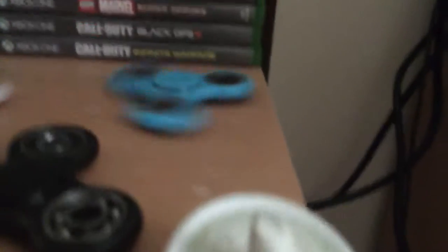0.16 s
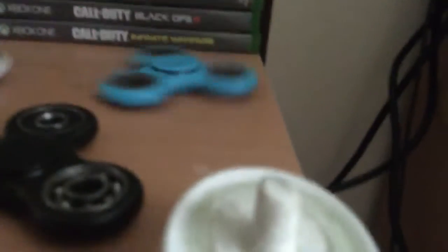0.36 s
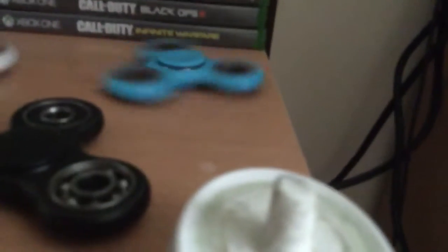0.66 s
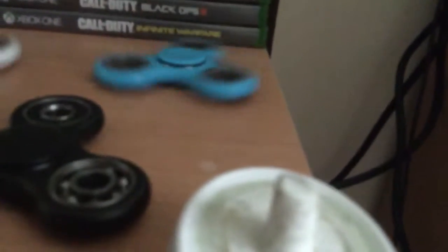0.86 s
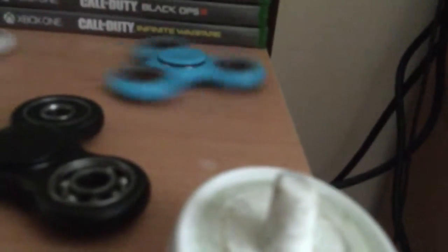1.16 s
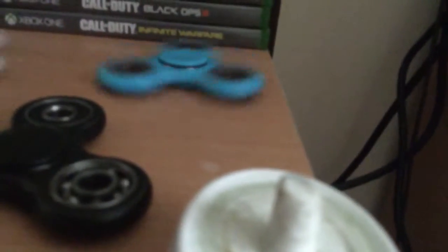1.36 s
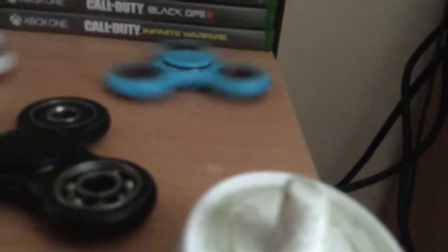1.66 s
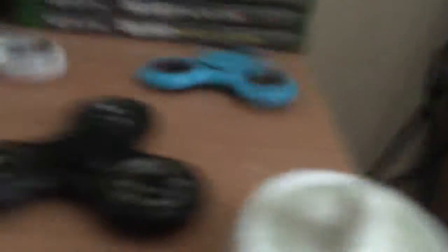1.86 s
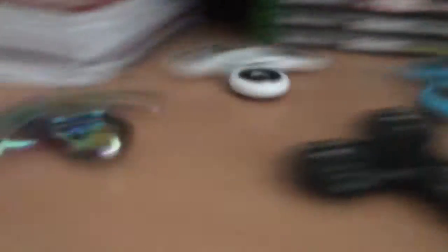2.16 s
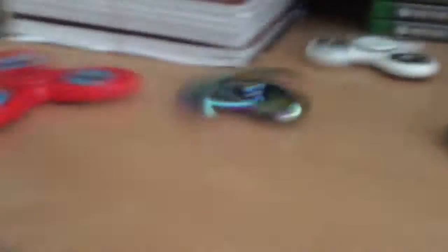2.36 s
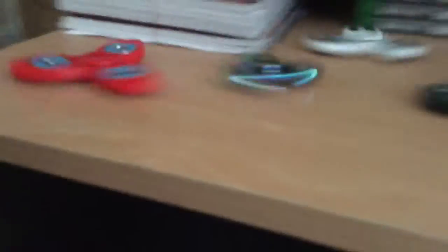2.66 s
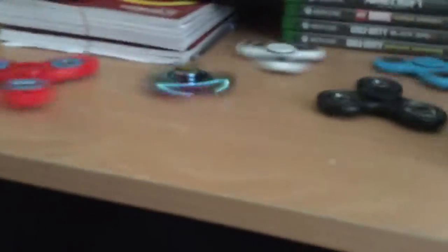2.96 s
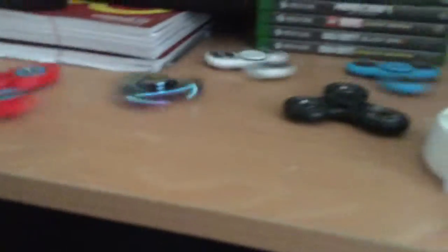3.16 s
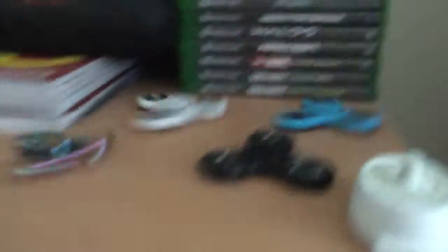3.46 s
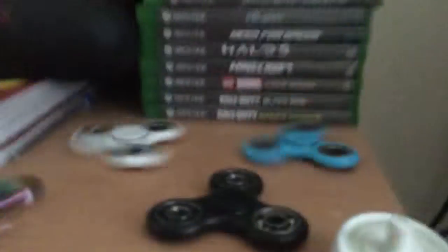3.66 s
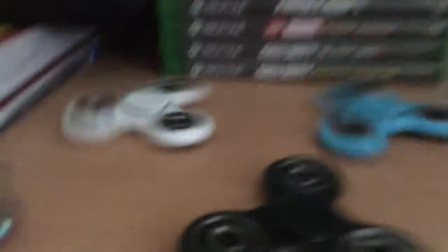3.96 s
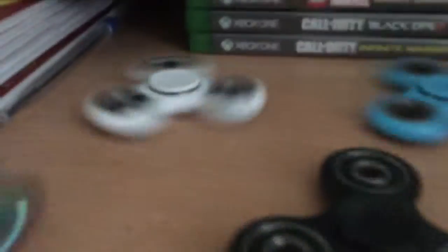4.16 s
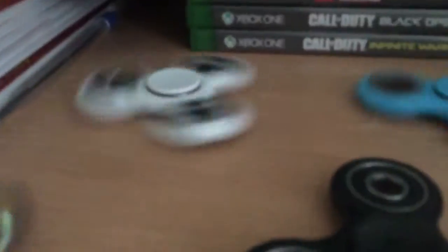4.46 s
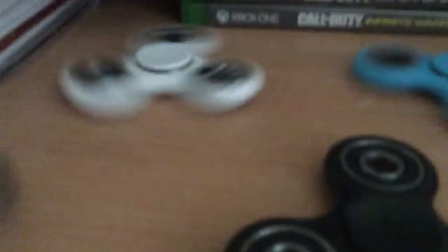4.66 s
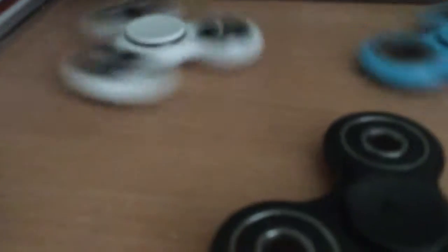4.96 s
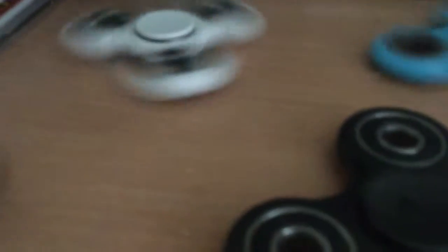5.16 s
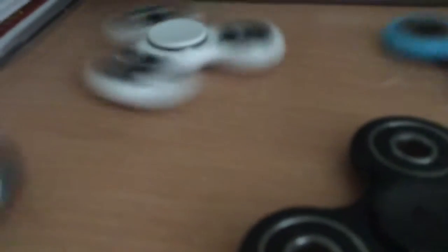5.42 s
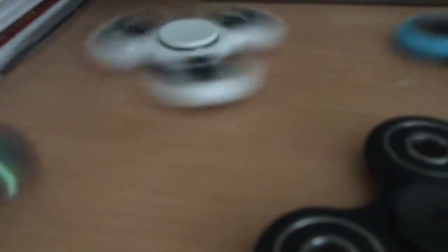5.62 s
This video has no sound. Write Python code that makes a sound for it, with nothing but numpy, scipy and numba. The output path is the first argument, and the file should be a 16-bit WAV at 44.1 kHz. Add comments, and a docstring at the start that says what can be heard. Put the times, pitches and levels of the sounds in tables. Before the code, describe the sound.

A dry metallic and plastic whirring rattle runs throughout, pulsing several times a second, with irregular ball clatters and dull low knocks. It starts close and full, grows fainter and mixed as the camera pans past other spinners in the middle, then comes near again after four seconds. Low handling rumbles and thumps, faint airy hiss and quiet indoor room tone; the handheld microphone stays close.

```python
"""A loose rattle over a humming desk comes first: four fidget spinners, with a camera panning close past.
Loose bearing balls rattle, harder once a turn, and ring each plastic or metal body and the desk top.
Catching bearings jolt the desk, and balls clatter. Fingers shift on the camera with rumbles, thumps and taps.
An airy hiss swells now and then, a quiet room hisses behind, and later come a rising whirr and thin whines."""
import sys
import numpy as np
from scipy import signal
from scipy.fft import rfft, irfft
from scipy.io import wavfile
from scipy.ndimage import uniform_filter1d, map_coordinates
from numba import njit

SR = 44100
rng = np.random.default_rng(int(sys.argv[2]) if len(sys.argv) > 2 else 0)


def undo_db(level):
    """Turn decibels back into plain size, where 20 dB means ten times bigger."""
    steps = np.asarray(level, float) / 20
    return 10 ** steps


def generate_wav(sig):
    """Save sig (samples, or channels by samples) to the path in sys.argv[1] as 16-bit PCM at SR."""
    pcm = np.round(np.clip(np.atleast_2d(sig).T, -1, 1) * 32767).astype(np.int16)
    wavfile.write(sys.argv[1], SR, pcm)


N = 255311  # length [samples]
T = np.arange(N) / SR  # time of each sample [s]
HZ = np.fft.rfftfreq(N, 1 / SR) + 1e-9  # just above zero, so that its logarithm exists

# Loudness of each spinner as the camera moves, before the dips:
# (time [s], first [dB], second [dB], third [dB], fourth [dB])
NEARNESS = [(0, -52, -58.5, -61.5, -63), (.6, -52, -62.5, -58, -64.5), (1.2, -51.5, -63, -81, -62.5),
            (1.85, -51.5, -64.5, -59, -61.5), (2.05, -61, -60.5, -56, -59), (2.3, -64, -58.5, -63, -62),
            (2.55, -73, -60, -78, -62), (3.1, -64.5, -62.5, -68, -75), (3.4, -63.5, -63, -62.5, -66),
            (3.6, -66, -69, -60, -58), (3.86, -81, -63.5, -53, -58.5), (4.05, -96, -61, -64.5, -55),
            (4.6, -62, -62, -85, -56), (5.2, -69, -63.5, -78, -54.5), (5.79, -61.5, -62, -77, -56)]
# Spin of each spinner: (start speed [turns/s], end speed [turns/s], basic swell once a turn [dB],
# rolling hiss over the rings [dB], a moment of loudest rattle [s])
SPIN = [(8.5, 8.2, 0.5, -23, .89), (8.6, 16, 1.9, -13.5, 2.65), (23, 23, 2, -25, 3.81),
        (10, 8.5, 1.5, -7.5, 5.19)]
# Body resonances of each spinner, before the pitch slides: (pitch [Hz], width [Hz], level [dB])
BODIES = [
    [(626, 25, -8.5), (830, 41, -4), (1107, 77, -1.5), (1490, 34, 5), (1593, 66, 5.5), (2277, 220, -2),
     (2966, 93, -2.5), (3397, 104, -2), (4110, 114, -0.5), (4920, 99, -7), (5420, 59, -10.5),
     (7000, 990, -32.5), (8650, 220, -32.5)],
    [(647, 15, -1.5), (1020, 23, -3.5), (1393, 137, -1.5), (1920, 59, -2), (2600, 73, 1.5),
     (3362, 130, -3.5), (4390, 120, -11), (5290, 195, -9.5), (6940, 200, -21.5)],
    [(580, 98, -18.5), (1409, 75, 4), (2013, 106, 2), (2703, 100, -3.5), (3610, 110, -8.5),
     (4940, 120, -12.5), (6960, 180, -24)],
    [(807, 24, 1), (1271, 87, 6), (1657, 226, 0.5), (2638, 240, 1.5), (3010, 232, -0.5), (4027, 170, -5),
     (4910, 92, -5.5), (5410, 120, -10), (5570, 71, -3.5), (6940, 170, -19.5)],
]
# Rings that flutter together: (from [Hz], to [Hz], share of the common swell [0-1], own flutter [dB])
RING_GROUPS = [(0, 2300, 0.41, 0.13), (2300, 3750, 0.59, 3), (3750, 9500, 0.79, 2)]
# The rings slide in pitch as the camera swings:
# (time [s], first [share of pitch], second [share], third [share], fourth [share])
RING_SLIDE = [(0, 0.98, 1.08, 1., 1.), (1.9, 1., 1.05, 1.06, 1.04), (2.1, 0.92, 0.98, 1.01, 1.01),
              (2.35, 0.94, 1.014, .96, .97), (2.8, 0.95, 0.99, .95, .97), (3.3, 0.95, 1.033, .96, .97),
              (3.7, 0.97, 1.03, .995, .985), (4.15, 0.95, 0.98, 1.03, 1.), (5.79, 1., 1.04, 1.03, 1.)]
# Colour of the rolling hiss between the resonances: (frequency [Hz], relative level [dB per Hz])
ROLL_COLOUR = [(300, -56), (600, 7), (1000, -8.5), (2000, 0.5), (3500, -7), (5600, 1), (6200, -11.5),
               (8000, -23), (11000, -27.5), (15200, -57)]
# The desk's echo cancels three bands that slide with the camera's height:
# (time [s], upper band [Hz], lower band [Hz], depth of these two [0-1], top band before its wander [Hz])
ECHO_DIP = [(0, 2040, 1154, 0.65, 3770), (1.95, 2050, 1150, 0.58, 3780), (2.4, 1420, 850, 0.56, 3540),
            (2.7, 1490, 806, 0.75, 3700), (3.1, 1500, 740, 0.67, 3900), (3.4, 1638, 860, 0.61, 3820),
            (3.7, 1760, 1020, 0.84, 3940), (4.4, 1920, 1105, 0.53, 3788), (5.79, 1930, 1130, 0.52, 3660)]
# A fourth narrow dip: (time [s], centre [Hz], depth [0-1])
MID_DIP = [(0, 2500, 0.2), (2.0, 2340, 0.26), (2.25, 2230, .7), (2.5, 2210, .9), (2.75, 2150, 0.2),
           (3.2, 2200, 0.6), (3.6, 2400, .3), (4.05, 2330, .75), (4.4, 2250, 0.2), (5.79, 2150, .4)]
# Colour of the airy hiss: (frequency [Hz], relative level [dB per Hz])
WHISK_COLOUR = [(5000, -26), (7500, 0), (9000, 3.5), (12000, -13), (15200, -12)]
# The airy hiss swells briefly: (middle [s], length [s], peak added to the steady part [dB])
WHISK_SWELLS = [(0.073, 0.087, -78), (.53, 0.11, -80), (0.748, 0.092, -88), (.97, .14, -82),
                (1.2, 0.089, -92), (1.398, .12, -85), (1.625, .12, -85), (1.823, .12, -84),
                (3.75, 0.11, -84), (4.08, .08, -88), (4.245, 0.14, -81), (5.03, .08, -81), (5.187, .1, -83),
                (5.54, 0.069, -79), (5.646, 0.12, -79)]
# Hum of the desk top, louder with the camera near: (time [s], level [dB], deeper mode over it [dB])
DESK_LEVEL = [(0, -50, -13), (.4, -54.5, -7), (.8, -52.5, -6), (1.5, -51, -8), (1.95, -50.5, -6),
              (2.07, -53, -13), (2.3, -57, -6), (2.6, -62, -3.5), (2.9, -62.5, -25), (3.2, -62.5, -8),
              (3.6, -61, -14), (4.15, -51, -9), (4.7, -51, -5.5), (5.1, -49.5, -9), (5.45, -51.5, -5),
              (5.79, -51, 0.5)]
# Pitch of the desk hum heard from the camera, before its wander: (time [s], pitch [Hz])
DESK_PITCH = [(0, 356), (2., 358), (3., 346), (4.2, 366), (4.6, 350.), (5.1, 337), (5.79, 347)]
# Desk top resonances: (share of that pitch [ratio], width before widening [Hz], relative level [dB])
DESK_MODES = [(0.998, 53.9, 2), (1.223, 121, -20)]
# Fingers slide on the case: (middle [s], length [s], peak rumble added to the hold [dB])
DRAGS = [(0.034, 0.088, -54.5), (0.26, 0.35, -49), (0.787, 0.083, -64), (0.912, 0.072, -56.5),
         (1.186, 0.18, -58), (1.426, 0.35, -57), (1.574, 0.15, -55), (1.72, 0.13, -52.5),
         (1.913, 0.37, -51), (2.12, 0.081, -57), (2.52, 0.2, -74), (2.736, 0.22, -62.5), (3.151, 0.13, -63),
         (3.487, 0.52, -56.5), (3.695, 0.5, -64), (3.994, 0.53, -59.5), (4.23, 0.28, -53),
         (4.432, 0.2, -61), (4.58, 0.14, -56), (4.7, 0.22, -51), (5.233, 0.27, -64.5), (5.583, 0.039, -54),
         (5.703, 0.15, -60.5)]
# Colour of skin rubbing on the case: (frequency [Hz], relative level [dB per Hz])
GRIP_COLOUR = [(50, -50), (75, -0.5), (105, 4.5), (135, -0.5), (180, -9.5), (240, -14), (320, -10),
               (500, -72)]
# Deep sway of the arm: (time [s], level [dB])
SWAY_LEVEL = [(0.0, -54), (0.35, -74), (0.47, -84), (0.55, -55), (0.61, -74), (1.85, -63), (1.89, -60),
              (2.43, -70.5), (3.77, -64), (4.11, -74), (4.19, -59), (4.24, -67), (4.74, -67), (4.84, -74),
              (5.76, -67), (5.79, -82)]
# Colour of the sway: (frequency [Hz], relative level [dB per Hz])
SWAY_COLOUR = [(13, -27), (25, -23), (45, -5.5), (65, 0), (80, -5), (110, -44), (200, -71)]
# Colour of the room hiss: (frequency [Hz], relative level [dB per Hz])
ROOM_COLOUR = [(100, -36), (200, 7.5), (500, -14), (1000, -3.5), (4000, -30), (8000, -19.5), (12000, -31),
               (15200, -56)]
# A bearing catches and jolts the desk: (time [s], peak of the swell [dB], ring [Hz])
JOLTS = [(0.021, -38, 331.7), (0.312, -39, 358), (0.458, -42.5, 357.4), (0.498, -43, 350), (0.53, -39, 358),
         (0.561, -41, 348), (0.708, -43, 344), (0.883, -45, 343), (1.017, -42, 356), (1.121, -41.5, 348),
         (1.685, -40.5, 350), (1.826, -37.5, 353), (1.924, -38.5, 320), (2.137, -46.5, 368),
         (2.196, -47, 326), (2.745, -48, 292), (2.764, -54, 302), (3.127, -48, 320), (3.152, -46.5, 322),
         (3.265, -47, 339), (3.434, -51.5, 362), (3.465, -48, 350), (4.233, -40.5, 364),
         (4.245, -37.5, 365), (4.537, -37.5, 360), (4.647, -43.5, 354), (4.698, -36.5, 330),
         (4.722, -46, 300), (4.754, -44, 370), (4.849, -37.5, 325), (4.93, -43, 342), (5.034, -45, 340),
         (5.128, -41.5, 307), (5.181, -39.5, 366), (5.229, -39.5, 340), (5.262, -42, 310),
         (5.308, -43, 312), (5.361, -40.5, 353), (5.496, -37.5, 312), (5.655, -39.5, 346), (5.69, -47, 340),
         (5.748, -51, 352)]
# A loose ball clatters, before the dips: (time [s], middle rings [dB], upper rings over them [dB])
CLATTER = [(0.08, -51, -4), (0.503, -49, -7), (0.531, -47, -9), (.678, -54, -18), (.785, -63, -7),
           (0.8918, -48, -8), (1., -53, -6), (1.019, -52, -6), (1.205, -50, -6), (1.34, -50, -18),
           (1.445, -46, -14), (1.56, -56, -15), (1.582, -49, -18), (2.002, -50, -24), (2.008, -47.5, -15),
           (2.033, -50, -11), (2.059, -48, -20), (2.0936, -51, -15), (2.143, -50, -4), (2.175, -49.5, -13),
           (2.237, -50, -8), (2.6487, -50.5, -8), (3.065, -57.5, -5), (3.702, -50, -13),
           (3.77, -48.5, -8.5), (3.799, -48, -21), (3.8635, -50, -9), (4.273, -49, -16), (4.56, -54, 0),
           (4.655, -49.5, -7.5), (4.8182, -53, -19), (4.956, -54, -17), (5.0274, -48, -12),
           (5.188, -45.5, -7.5), (5.325, -51.5, -25), (5.41, -49, -15), (5.536, -47, -3.5),
           (5.576, -48, -9), (5.692, -49.5, -18), (5.733, -48.5, -9)]
# Lowest ring of the clatter, by the spinner nearest the camera: (time [s], pitch [Hz])
CLATTER_PITCH = [(0, 2980), (1.9, 3050.), (2., 2780.), (2.5, 2610), (3.6, 2720.), (5.79, 2800.)]
# Thumps of the hand: (time [s], peak of the swell [dB], pitch [Hz], length [cycles])
THUMPS = [(0.258, -49, 78, 1.3), (0.319, -52, 102, 2.7), (0.365, -42, 107, 2.5), (1.436, -47, 133, 1.7),
          (1.559, -40, 143, 1.6), (1.923, -43, 111, 2.9), (1.925, -38.5, 190, 1.8), (2.741, -50, 130, 1),
          (2.759, -46, 140, 2.1), (1.973, -48, 200, 2), (3.141, -51, 201, 5.1), (3.259, -44, 165, 5.3),
          (3.402, -43, 110, 3.2), (3.519, -50, 95, 5.2), (3.771, -47, 76, 2.7), (4.157, -38.5, 78.5, 2.9),
          (4.168, -45.5, 139, 3.3), (4.575, -53, 94, 2.5), (4.692, -47, 85, 2.6), (5.385, -50, 75, 2.3),
          (5.355, -48, 225, 5.5)]
# A fingertip taps the case: (time [s], strength [dB])
TAPS = [(1.9788, -27.5), (1.9822, -38), (1.9857, -40), (2.007, -38)]
# Rings of the tapped case: (pitch [Hz], relative level [dB], time to fall by 60 dB [s])
CASE_RINGS = [(815, 8.5, 0.035), (1120, 4.5, 0.033), (1500, 9.5, 0.017), (453, 5, 0.069), (302, 4, 0.044)]
# A short rising whirr as the camera swings back: (time [s], level [dB], pitch [Hz])
WHIRR = [(3.3, -93, 600), (3.45, -74, 664), (3.55, -62, 707), (3.65, -90, 735), (3.8, -102, 746)]
# Thin high tones come and go: (middle [s], length [s], peak before flicker and tone levels [dB])
WHINE_SWELLS = [(4.096, 0.034, -71), (5.572, 0.15, -78), (5.647, .07, -88)]
# The thin tones: (pitch [Hz], level over the swell [dB])
WHINE_TONES = [(14754, 2), (13457, -8)]
# Dips of the microphone port: (centre [Hz], width [Hz], depth [0-1])
PORT_DIPS = [(6270, 630, 0.36), (4690, 380, 0.36)]


def level(x, db):
    """Scale to an rms level."""
    return x * undo_db(db) / np.sqrt(np.mean(x ** 2))


def curve(table, column):
    """Join the points in one column of a table with straight lines, sample by sample."""
    return np.interp(T, [row[0] for row in table], [row[column] for row in table])


def colour(x, points):
    """Shape a spectrum by (frequency [Hz], level [dB]) points."""
    hz, db = np.transpose(points)
    return irfft(rfft(x) * undo_db(np.interp(np.log(HZ), np.log(hz), db)), N)


def ring(x, peaks):
    """Band-pass resonances of alternating sign, side by side."""
    gain = 0
    for k, (hz, width, db) in enumerate(peaks):
        detune = (HZ ** 2 - hz ** 2) / (HZ * width)
        gain = gain + (-1) ** k * undo_db(db) / (1 + 1j * detune)
    return irfft(rfft(x) * gain, N)


@njit
def glide(x, hz, width):
    """A resonance with a moving centre (state-variable band-pass)."""
    y, band, low = np.empty(len(x)), 0., 0.
    for i in range(len(x)):
        g, damping = np.tan(np.pi * hz[i] / SR), width / hz[i]
        v = (band + g * (x[i] - low)) / (1 + g * (g + damping))
        band, low = 2 * v - band, low + 2 * g * v
        y[i] = damping * v
    return y


def walk(rate):
    """Random levels held 1 / rate s and smoothed twice; spread near 1."""
    hold = int(SR / rate)
    steps = np.repeat(rng.standard_normal(N // hold + 1), hold)
    return 1.41 * uniform_filter1d(uniform_filter1d(steps, hold), hold)[:N]


def add(out, s, sound):
    """Mix a short sound in at time s."""
    i = max(int(s * SR), 0)
    out[i:i + len(sound)] += sound[:N - i]


def balls(per_s, spread_db):
    """Tiny ball contacts at random moments, of uneven strength and either sign."""
    chance, size, push = rng.random(N), rng.exponential(size=N), rng.standard_normal(N)
    hit = chance < per_s / SR
    return level(hit * push * undo_db(spread_db * np.minimum(size, 3.0)), 0)


def spinner(near_db, slide, spin, body):
    """Ball contacts ring the body and swell once a turn; low, middle and top rings each flutter on their own."""
    start, end, swell_db, hiss_db, loudest_s = spin
    loudest = int(loudest_s * SR)
    turn = 2 * np.pi * np.cumsum(np.linspace(start, end, N) * (1 + .02 * walk(3))) / SR
    turn = turn - turn[loudest]  # the swell peaks at the loudest moment
    uneven, quick = walk(7), walk(70) + .8 * walk(24)
    drift, flicker = walk(12), walk(60)
    shared_db = swell_db * (1 + 0.4 * uneven) * np.cos(turn) + 2.0 * quick

    # the loosest ball rings the whole body at once
    ticks = balls(per_s=700, spread_db=2.5) * undo_db(swell_db * np.cos(turn))
    rings = ring(undo_db(-4.5) * ticks, body)
    for low_hz, high_hz, share, own_db in RING_GROUPS:
        flutter = walk(120)
        contacts = balls(per_s=2500, spread_db=2.5) * undo_db(share * shared_db + own_db * flutter)
        rings = rings + ring(contacts, [mode for mode in body if low_hz <= mode[0] < high_hz])

    # played faster or slower to slide the pitch, in step at the loudest moment
    pace = np.cumsum(slide * (1 + .005 * walk(9)))
    rings = map_coordinates(rings, [pace + loudest_s * SR - pace[loudest]], mode="mirror")
    hiss = balls(per_s=12000, spread_db=2.0) * undo_db(.5 * shared_db + 0.8 * drift + 2.5 * flicker)
    return undo_db(near_db) * (level(rings, 0) + level(colour(hiss, ROLL_COLOUR), hiss_db))


def echo_lower_dips(sound):
    """The desk's echo cancels the two lower of its three sliding bands."""
    upper = glide(sound, curve(ECHO_DIP, 1), 470.0)
    lower = glide(sound, curve(ECHO_DIP, 2), 197.0)
    return sound - curve(ECHO_DIP, 3) * (upper + lower)


def echo_top_dip(sound):
    """The desk's echo cancels most of a top band, which also wanders a little."""
    hz = curve(ECHO_DIP, 4) + 12 * walk(6)
    return sound - 0.92 * glide(sound, hz, 150.)


def middle_dip(sound):
    """One more narrow band sinks by a changing depth."""
    return sound - curve(MID_DIP, 2) * glide(sound, curve(MID_DIP, 1), 225)


def whisk():
    """A grainy airy hiss follows the spinners' loudness and swells now and then."""
    flicker = walk(30)
    nearness = sum(undo_db(curve(NEARNESS, k + 1)) for k in range(len(SPIN)))
    swell = undo_db(-45) * nearness  # the steady part
    for s, length, db in WHISK_SWELLS:
        add(swell, s - length / 2, undo_db(db) * np.hanning(int(length * SR)))
    grains = colour(balls(per_s=8000, spread_db=6.0), WHISK_COLOUR)
    return swell * level(grains * undo_db(2.5 * flicker), 0)


def desk():
    """The rattle passes through the spinner caps into the desk top, which hums in bursts over a deeper mode."""
    shake = balls(per_s=2000, spread_db=1.0) * undo_db(0.53 * walk(22.04))
    pitch = curve(DESK_PITCH, 1) + 12.3 * walk(7.4)
    hum = 0
    for share, width, db in DESK_MODES:
        hz, wide = share * pitch, 1.33 * width  # widened, since two passes narrow the band
        hum = hum + undo_db(db) * glide(glide(shake, hz, wide), hz, wide)
    surge, deep_surge = walk(12), walk(10)
    deep_mode = [(277.3, 79, 0)]  # (pitch [Hz], width [Hz], level [dB])
    deep = ring(ring(shake, deep_mode), deep_mode) * undo_db(4.5 * deep_surge)
    under = level(deep, 0) * undo_db(curve(DESK_LEVEL, 2))
    return undo_db(curve(DESK_LEVEL, 1)) * (level(hum * undo_db(0.38 * surge), 0) + under)


def finger_drags():
    """Skin rubs on the case: a low rumble from holding it, stronger as fingers slide."""
    hold_db, hold_surge_db = -72, 4.5
    pressure = undo_db(hold_db + hold_surge_db * walk(14))
    for s, length, db in DRAGS:
        add(pressure, s - length / 2, undo_db(db) * np.hanning(int(length * SR)))
    return level(colour(rng.standard_normal(N), GRIP_COLOUR), 0) * pressure


def arm_sway():
    """The swaying arm makes a very deep rumble."""
    surge_db = 1
    rumble = colour(rng.standard_normal(N), SWAY_COLOUR) * undo_db(surge_db * walk(12))
    return level(rumble, 0) * undo_db(curve(SWAY_LEVEL, 1))


def room():
    """Steady random noise, coloured as the hiss of a quiet room."""
    return level(colour(rng.standard_normal(N), ROOM_COLOUR), -73.5)


def jolts():
    """Each catch is a short hum of the desk that swells and dies away."""
    out = np.zeros(N)
    t = np.arange(int(.06 * SR)) / SR
    rise = t / 0.0046  # 1 at the peak, 4.6 ms in
    for s, db, hz in JOLTS:
        add(out, s, undo_db(db) * rise * np.exp(1 - rise) * np.sin(2 * np.pi * hz * t))
    return out


def clatter():
    """Short spits of noise, heard in the middle and upper rings of the bearing."""
    mid, top = np.zeros(N), np.zeros(N)
    rise = np.arange(int(.04 * SR)) / SR / 0.0022  # 1 at the peak, 2.2 ms in
    shape = rise * np.exp(1 - rise)
    for s, db, top_db in CLATTER:
        add(mid, s - .001, undo_db(db) * shape)
        add(top, s - .001, undo_db(db + top_db) * shape)
    hz, noise = curve(CLATTER_PITCH, 1), rng.standard_normal(N)
    middle, upper = [(4120, 120, -6.5)], [(5280, 820, 0)]  # (pitch [Hz], width [Hz], level [dB])
    lowest = glide(glide(noise, hz, 500.), hz, 500.)
    middle_rings = level(lowest + ring(noise, middle), 0)
    upper_rings = level(ring(ring(rng.standard_normal(N), upper), upper), 0)
    return mid * middle_rings + top * upper_rings


def thumps():
    """Each thump of the hand is a few low cycles that swell and fade."""
    out = np.zeros(N)
    for s, db, hz, cycles in THUMPS:
        t = np.arange(int(cycles / hz * SR)) / SR
        add(out, s, undo_db(db) * np.hanning(len(t)) * np.sin(2 * np.pi * hz * t))
    return out


def taps():
    """A fingertip sets the case ringing and adds a dull scuff of skin."""
    out, skin = np.zeros(N), np.zeros(N)
    t = np.arange(int(.08 * SR)) / SR
    tap = sum(undo_db(db) * np.sin(2 * np.pi * hz * t) * undo_db(-60 * t / t60) for hz, db, t60 in CASE_RINGS)
    tap = tap * (1 - np.exp(-t / 0.0011))  # a soft fingertip pushes gradually
    for s, db in TAPS:
        add(out, s, undo_db(db) * tap / len(CASE_RINGS))
        add(skin, s, undo_db(db - 25.0) * undo_db(-60 * t / 0.13))
    pad = [(850, 640, 0)]  # the fingertip's dull band (pitch [Hz], width [Hz], level [dB])
    scuff = level(ring(ring(rng.standard_normal(N), pad), pad), 0)
    return out + skin * scuff


def whirr():
    """A narrow band of rattle that slides upward."""
    hz = curve(WHIRR, 2)
    band = glide(glide(balls(per_s=3100, spread_db=2.0), hz, 87.0), hz, 87.0)
    return level(band, 0) * undo_db(curve(WHIRR, 1))


def whine():
    """Two thin tones near the top of hearing, in short flickering swells."""
    swell = np.zeros(N)
    for s, length, db in WHINE_SWELLS:
        add(swell, s - length / 2, undo_db(db) * np.hanning(int(length * SR)))
    tones = sum(undo_db(db) * np.sin(2 * np.pi * hz * T) for hz, db in WHINE_TONES)
    return swell * undo_db(3.0 * walk(60)) * tones


def scene():
    """All sources at one microphone."""
    rattle = 0
    for k in range(len(SPIN)):
        rattle = rattle + spinner(curve(NEARNESS, k + 1), curve(RING_SLIDE, k + 1), SPIN[k], BODIES[k])
    rattle = echo_lower_dips(rattle) + clatter()
    rattle = middle_dip(echo_top_dip(rattle))
    hand = finger_drags() + arm_sway() + thumps() + taps()
    return (rattle + whisk() + desk() + hand + room() + jolts() + whirr() + whine())[None]


def roll_off(x):
    """The treble ends steeply here."""
    return signal.sosfilt(signal.butter(12, 15270, fs=SR, output="sos"), x)


def record(dry):
    """The microphone port weakens a few bands of the finished mix."""
    sound = dry[0]
    for hz, width, depth in PORT_DIPS:
        sound = sound - depth * ring(sound, [(hz, width, 0)])
    return roll_off(sound[None])


dry = scene()
out = record(dry)
generate_wav(out)
```